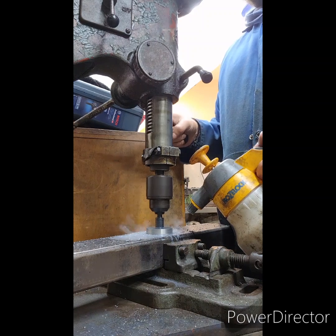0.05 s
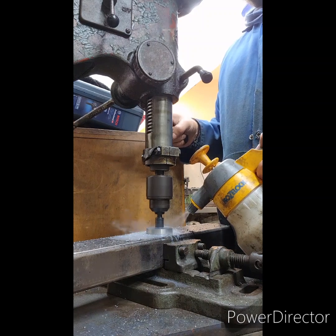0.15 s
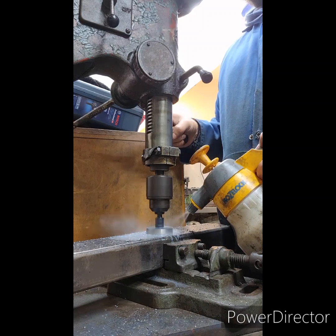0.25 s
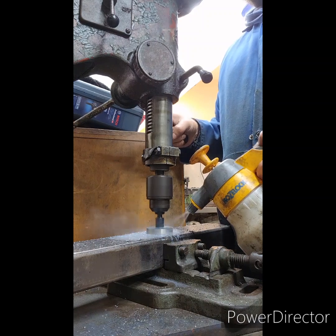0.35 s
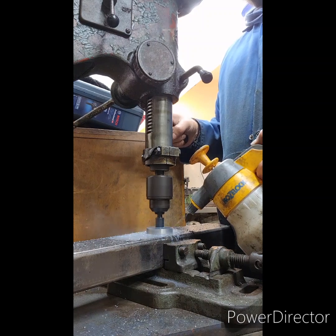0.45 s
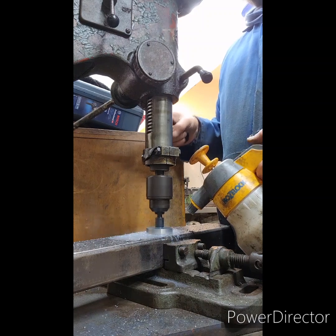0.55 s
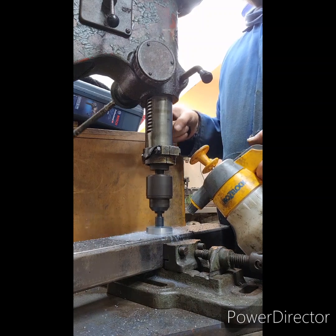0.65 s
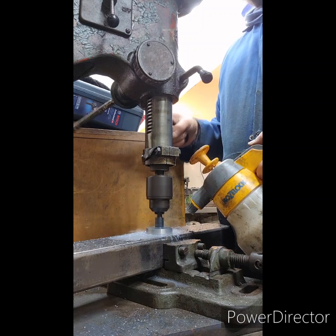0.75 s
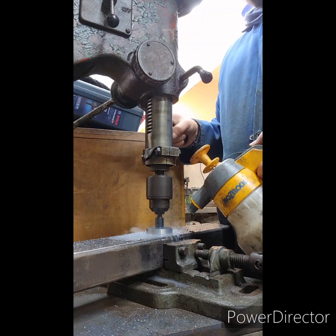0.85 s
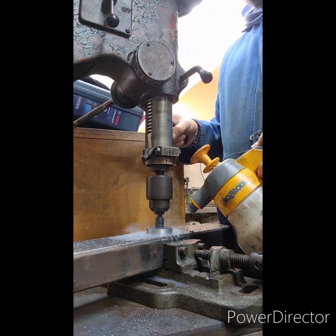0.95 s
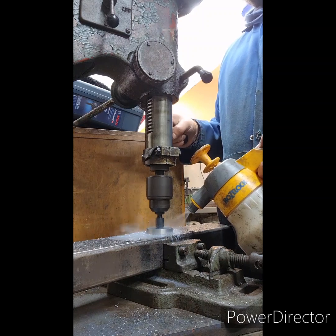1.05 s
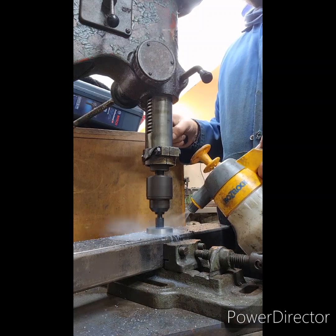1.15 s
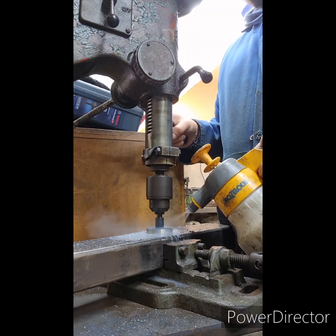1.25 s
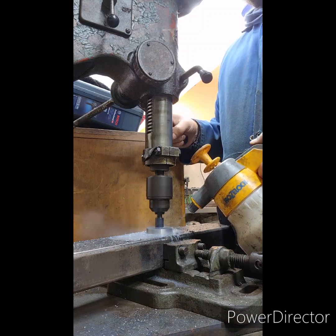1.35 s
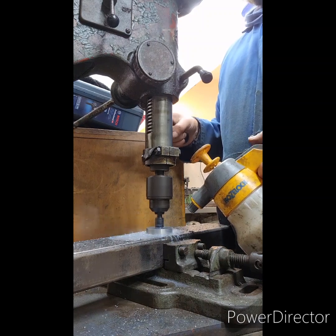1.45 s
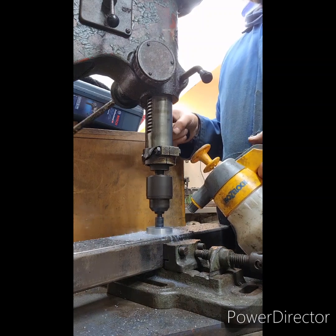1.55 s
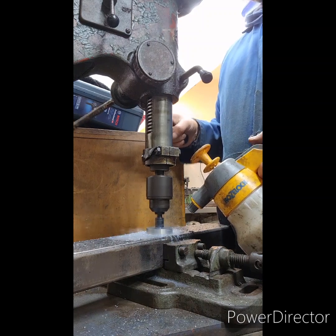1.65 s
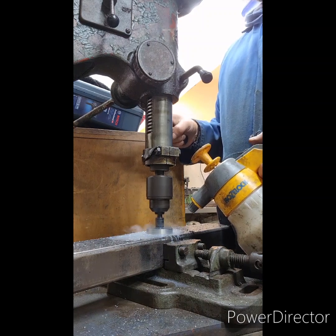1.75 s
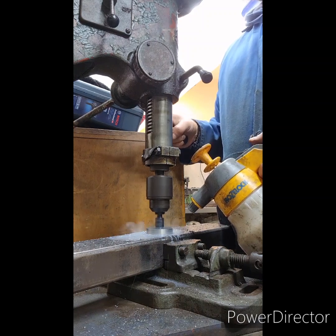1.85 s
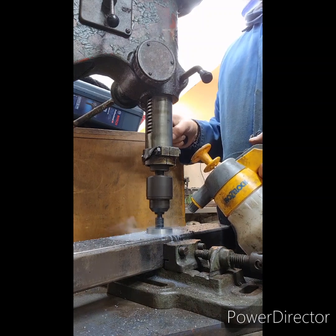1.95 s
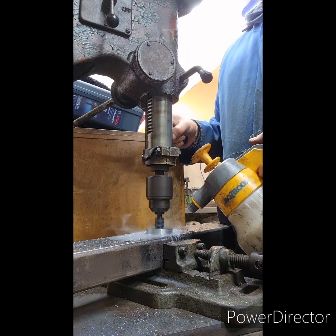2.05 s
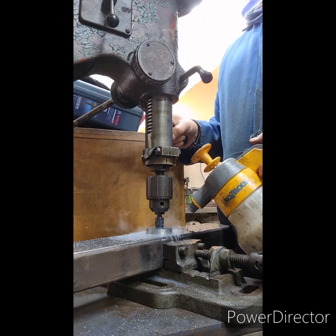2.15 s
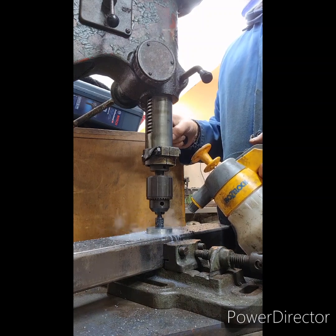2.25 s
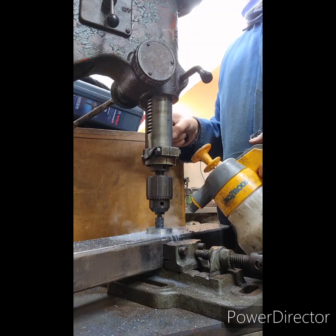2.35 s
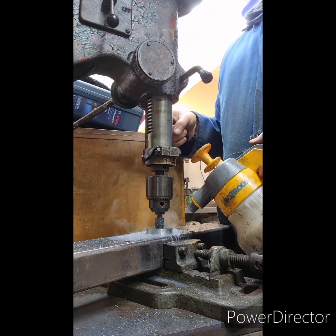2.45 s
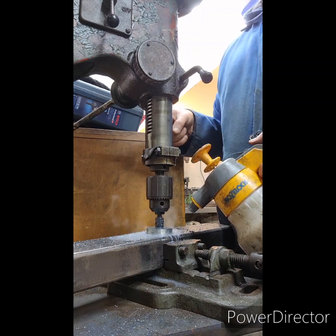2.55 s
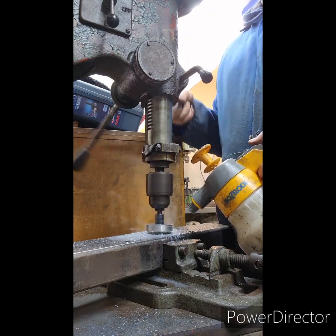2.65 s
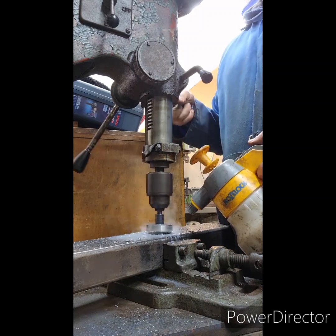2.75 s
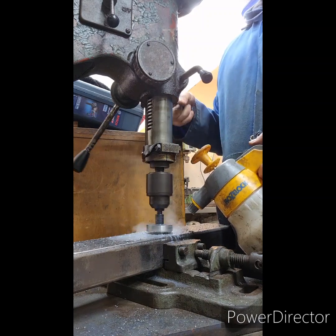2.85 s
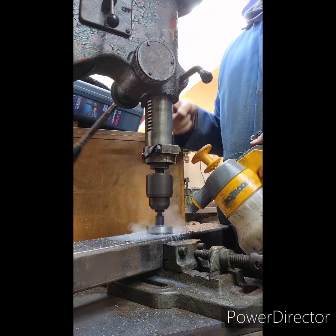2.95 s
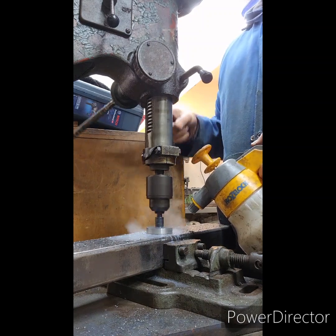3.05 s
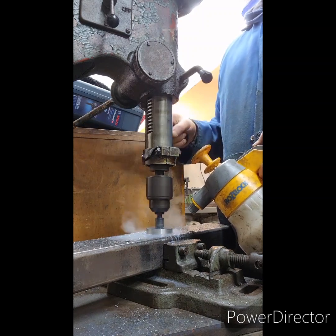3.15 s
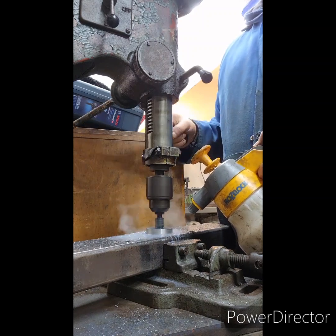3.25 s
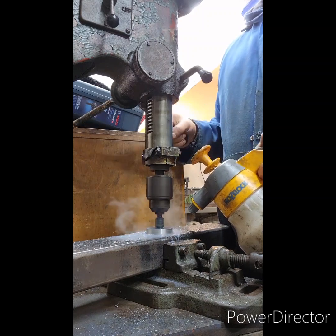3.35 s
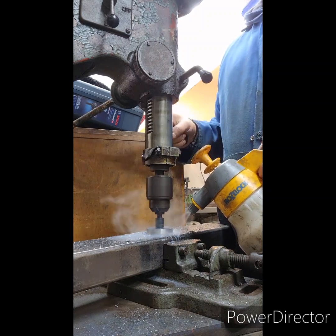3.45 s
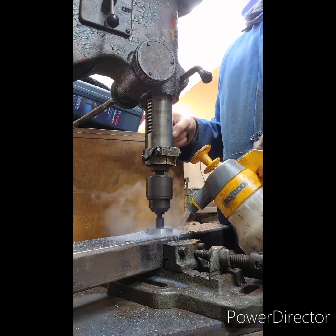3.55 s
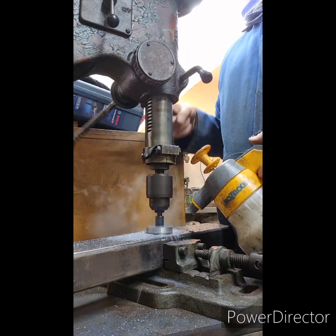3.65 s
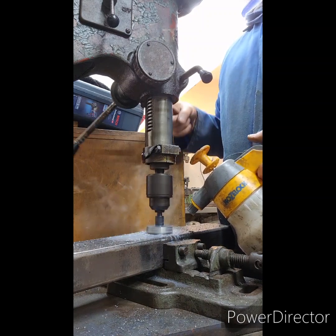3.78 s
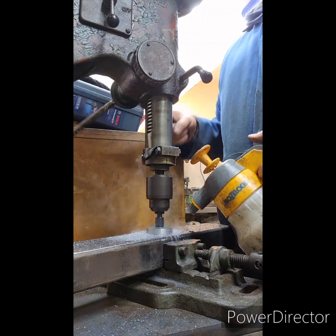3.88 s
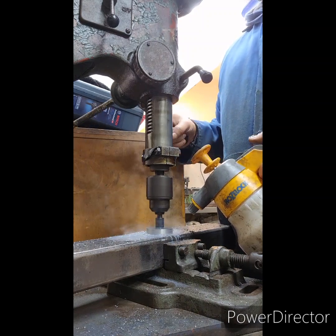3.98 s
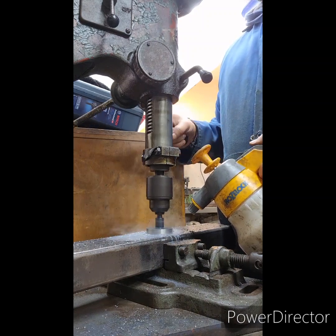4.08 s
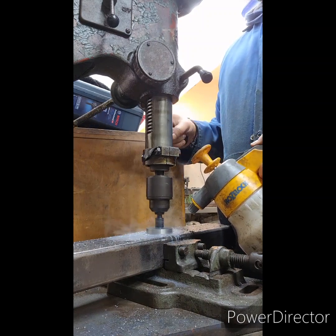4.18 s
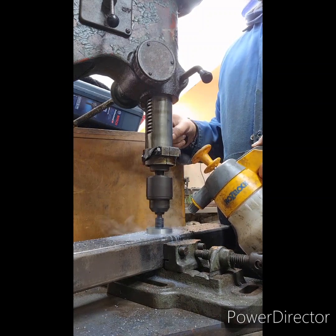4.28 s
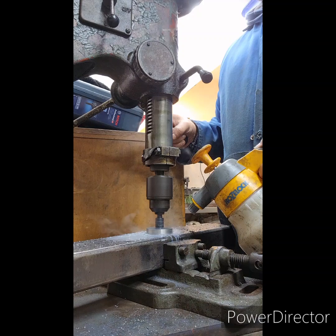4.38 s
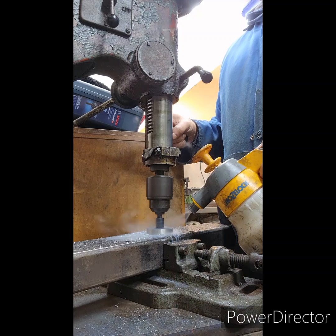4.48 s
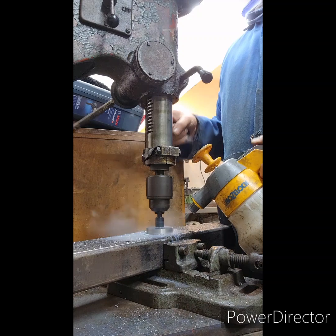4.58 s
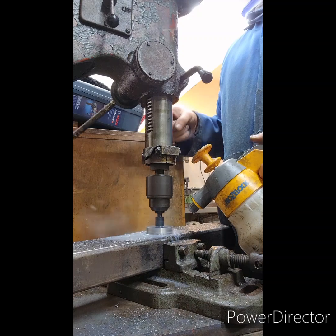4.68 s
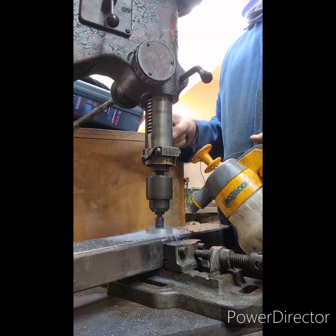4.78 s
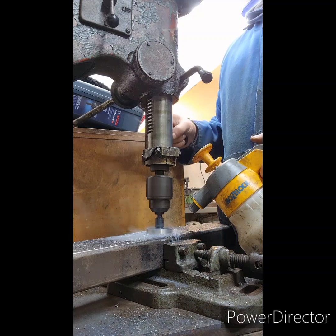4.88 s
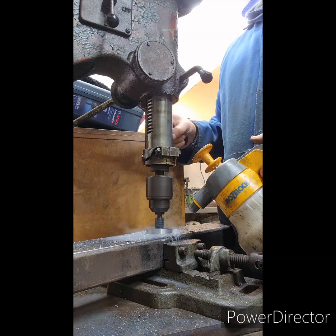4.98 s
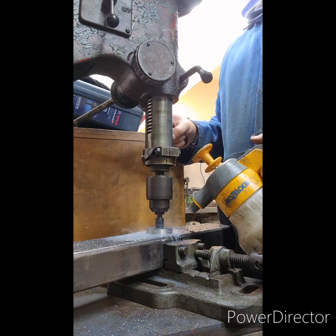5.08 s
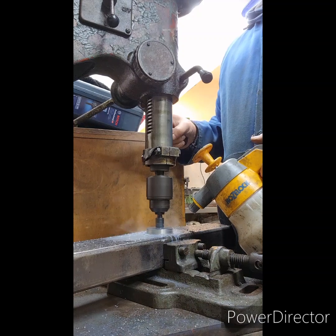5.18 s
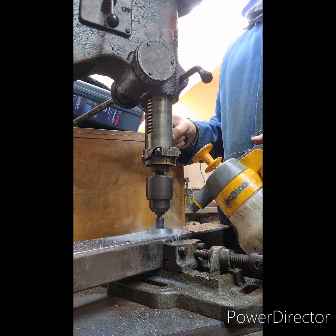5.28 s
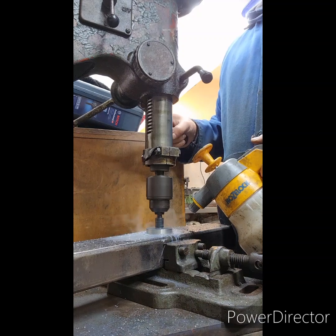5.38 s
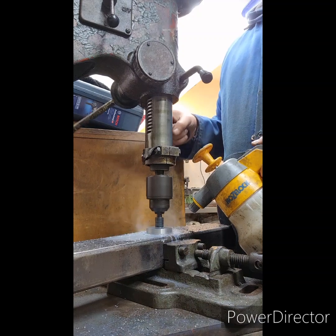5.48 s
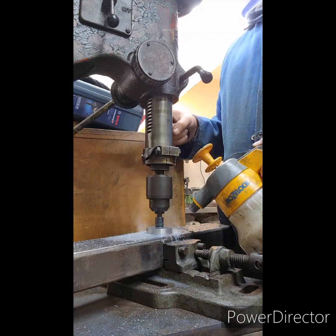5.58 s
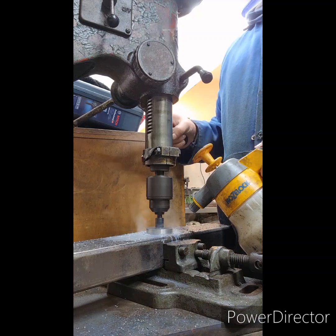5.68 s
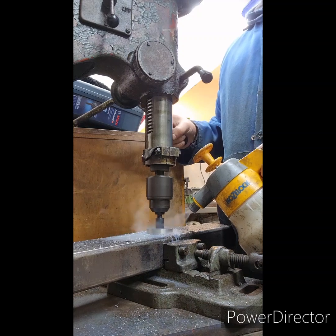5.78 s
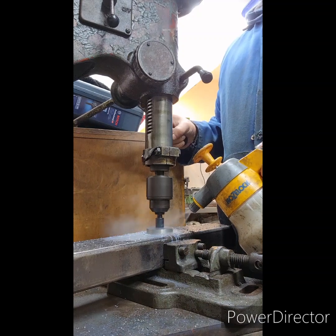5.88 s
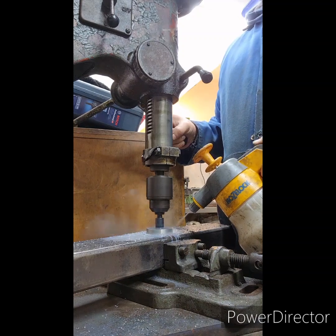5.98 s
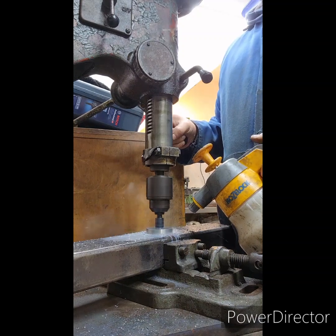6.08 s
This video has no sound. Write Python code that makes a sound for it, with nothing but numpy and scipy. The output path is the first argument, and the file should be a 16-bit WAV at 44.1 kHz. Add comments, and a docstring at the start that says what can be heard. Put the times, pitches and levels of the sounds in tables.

```python
"""Scraping, ringing steel: a hole saw in a pillar drill is fed into a box section in seven short pecks.
Filtered noise and noise-fed modes make the cut; tones make the chatter, its surges timed to spindle turns.
One light peck squeals at length. Between pecks a motor of summed shaft orders hums, and the slack drive
knocks about once a motor turn: noise blows, with a ringing quill. A small garage adds a short echo."""
import sys
import numpy as np
from scipy import signal
from scipy.fft import rfft, irfft
from scipy.io import wavfile

SR = 44100
rng = np.random.default_rng(int(sys.argv[2]) if len(sys.argv) > 2 else 0)


def generate_wav(sig):
    """Save sig (samples, or channels by samples) to the path in sys.argv[1] as 16-bit PCM at SR."""
    pcm = np.round(np.clip(np.atleast_2d(sig).T, -1, 1) * 32767).astype(np.int16)
    wavfile.write(sys.argv[1], SR, pcm)


N = 270333
T = np.arange(N) / SR


def amp(db):
    """Decibels to gain."""
    return 10 ** (np.asarray(db) / 20)


def unit(x):
    """Scales to rms 1."""
    return x / np.sqrt(np.mean(np.abs(x) ** 2) + 1e-20)


def read(points, hz):
    """Reads a spectrum table on a log-frequency axis."""
    f, value = np.transpose(points)
    return np.interp(np.log(hz + 1), np.log(f + 1), value)


def curve(rows, axis=1):
    """One column of a time table at every sample."""
    rows = np.asarray(rows)
    return np.interp(T, rows[:, 0], rows[:, axis])


def gate(rows, fade_s=0.023):
    """Open between the first and last row of a table, with a fade outside each end."""
    return np.clip(np.minimum(T - rows[0][0], rows[-1][0] - T) / fade_s + 1, 0, 1)


def stretch(start_s, length_s, fade_s):
    """Rises from 0 to 1 and falls back within a stretch of time."""
    return np.clip(np.minimum(T - start_s, start_s + length_s - T) / fade_s, 0, 1)


def hump(start_s, length_s):
    """Half-sine swell from 0 to 1 and back."""
    return np.sin(np.pi * np.clip((T - start_s) / length_s, 0, 1))


def phase_of(hz):
    """Phase in radians of a pitch curve."""
    return 2 * np.pi * np.cumsum(hz) / SR


def add(mix, start_s, sound):
    """Adds a sound into the mix at a start time."""
    part = mix[..., max(round(start_s * SR), 0):][..., :sound.shape[-1]]
    part += sound[..., :part.shape[-1]]


def drift(rate_hz):
    """Smooth random curve of rms 1, rolled off above the rate."""
    coarse = rng.standard_normal(4096)
    f = np.fft.rfftfreq(len(coarse), T[-1] / len(coarse))
    slow = irfft(rfft(coarse) / np.sqrt(1 + (f / rate_hz) ** 6))
    return unit(np.interp(T, np.linspace(0, T[-1], len(coarse)), slow))


def hiss():
    """Two unrelated white noises: a direct part and a scattered part."""
    return rng.standard_normal((2, N))


def colour(x, points, size=4096):
    """Causal minimum-phase filter with the given spectrum; keeps the power of white noise."""
    log_gain = np.log(amp(read(points, np.abs(np.fft.fftfreq(size, 1 / SR)))))
    taps = np.fft.ifft(np.exp(np.conj(signal.hilbert(log_gain)))).real[:size // 2]
    return signal.oaconvolve(x, taps[None] / np.linalg.norm(taps), axes=1)[:, :N]


def resonate(x, hz, width_hz):
    """A resonance of gain 1 that follows a pitch curve, with steep skirts."""
    turn = np.exp(2j * np.pi * np.cumsum(hz * np.ones(x.shape[-1])) / SR)
    r = np.exp(-np.pi * width_hz / np.sqrt(np.sqrt(2) - 1) / SR)  # two poles share the width
    baseband = x * turn.conj() + 1e-18
    smooth = signal.lfilter([(1 - r) ** 2], [1, -2 * r, r * r], baseband)
    return 2 * (turn * smooth).real


def streaks(x, depth_db, span_hz, span_s, size=1024):
    """Lets narrow patches of the spectrum swell and fade, as many weak modes do."""
    z = signal.stft(x, SR, nperseg=size, noverlap=size * 3 // 4)[2]
    across = np.fft.fftfreq(z.shape[1], SR / size)[:, None] * span_hz
    along = np.fft.fftfreq(z.shape[2], size / 4 / SR) * span_s
    blur = np.exp(-2 * (across ** 2 + along ** 2))
    field = np.fft.ifft2(np.fft.fft2(rng.standard_normal(z.shape[1:])) * blur).real
    z = z * amp(depth_db * unit(field))
    return unit(signal.istft(z, SR, nperseg=size, noverlap=size * 3 // 4)[1][:, :N])


def peck(start_s, attack_s, length_s, release_db_per_s):
    """Envelope of one peck: the teeth come in, hold, and are lifted out."""
    lifted = np.maximum(T - start_s - length_s, 0)
    return np.clip((T - start_s) / attack_s, 0, 1) ** 2 * amp(-release_db_per_s * lifted)


# pecks of the feed lever: start_s, attack_s, length_s (start to release), release_db_per_s, scrape_db,
#   screech_length_s, screech_db, first_surge_delay_s, chatter_hz, chatter_glide_hz_per_s, chatter_db
PECKS = [(-0.03, 0.077, 0.65, 168, -18.5, 0.21, -26, 0.072, 208, -6, -16),
         (0.849, 0.066, .69, 216, -18.5, 0.13, -28.5, 0.027, 215, -20.5, -18),
         (1.752, 0.043, .426, 280, -18, 0.22, -27, 0.1, 227, 110.5, -17.5),
         (3.192, 0.056, 0.47, 232, -25, .09, -23, 0.081, 215, -20, -29),
         (4.035, 0.037, 0.58, 213, -17.5, 0.1677, -25.5, 0.0434, 210, 1, -18.5),
         (4.9, .025, .585, 154, -18, 0.32, -33, 0.11, 220, 150, -18),
         (5.724, .13, 0.47, 200, -17.5, 0.069, -26, 0.13, 216, -22, -17.5)]
EASE_DB_PER_S = 4.5


def feed():
    """How hard the teeth scrape: each peck's pressure eases, then dies away as the lever is let up."""
    return sum(peck(start, attack, length, release) * amp(db - EASE_DB_PER_S * np.maximum(T - start, 0))
               for start, attack, length, release, db, *_ in PECKS)


# ringing of cup and steel while cutting: mode_hz, width_hz, relative_db
STEEL_MODES = [(1139, 17, -23), (1671, 66, -14), (1900, 30, -11.5), (2070, 160, -28), (2759, 40, -16.5),
               (3426, 97, -13.5), (3680, 13, -17.5), (4770, 430, -19), (5330, 49, -15), (6280, 110, -18),
               (6400, 21, -18), (6407, 45, -12.5), (10100, 85, -25.5), (11700, 120, -27)]
# broad colour of the scraping: frequency_hz, relative_db_per_hz
SCRAPE = [(300, -3.5), (550, 2), (900, -2), (1300, -1.5), (2100, 5), (3050, 0), (4600, 1), (5800, -0.5),
          (6900, 1), (7800, -9), (10300, -11), (12600, -15), (14500, -18), (15500, -26)]
# groan of the frame: frequency_hz, relative_db_per_hz
GROAN = [(25, -40), (55, -6), (85, -26), (130, -22), (190, 3.5), (270, 1.5), (350, 2.5), (430, -7.5),
         (510, -3.5), (670, -6), (850, -16.5), (1500, -56.5)]


def cutting(groan_db=-6, crumble_db=0.5, surge_db=0.3, swell_db=4, wander=0.0029):
    """Teeth tear chips off the steel: a gritty scrape, modes that swell in turn, and a groan in the frame."""
    bite = feed()
    force = bite * amp(surge_db * drift(2.2))
    grit = streaks(hiss() * amp(crumble_db * drift(450)), depth_db=2.6, span_hz=120, span_s=0.045)
    scrape = colour(grit * force, SCRAPE)
    rumble = streaks(hiss(), depth_db=1.5, span_hz=50, span_s=0.082)
    groan = amp(groan_db) * colour(rumble * force, GROAN)
    ring = 0
    for hz, width_hz, db in STEEL_MODES:
        # fed in bursts as the teeth catch and let go
        bursts = hiss() * amp(swell_db * drift(22))
        mode = resonate(bursts, hz * (1 + wander * drift(18)), width_hz)
        ring = ring + amp(db) * unit(mode)
    return scrape + groan + ring * bite


SPINDLE_HZ = 7.8
BUILD_S, SURGE_DB, CLIMB_HZ = 0.1, 4, 42  # CLIMB_HZ: pitch rise per spindle turn
CHATTER_STOP_S, CHATTER_RELEASE_DB_PER_S = 0.0089, 257  # needs full load: stops before the lever is let up


def chatter(jitter=0.028, flutter_db=1.5, second_db=-21, third_db=-21, lean_db=-0.1):
    """Under load the saw bounces on the springy quill: a lumpy low tone that surges every spindle turn."""
    pitch, level = np.full(N, 215.), np.zeros(N)
    for start, attack, length, _, _, _, _, delay, hz, glide, db in PECKS:
        since = np.maximum(T - start, 0)
        turn = ((since - delay) * SPINDLE_HZ + 0.5) % 1 - 0.5  # zero at the top of a surge
        trend = glide * (np.minimum(since, length) - length / 2)
        pitch = np.where(T >= start, hz + trend + CLIMB_HZ * turn, pitch)
        loaded = peck(start, attack, length - CHATTER_STOP_S, CHATTER_RELEASE_DB_PER_S)
        built = loaded * (1 - np.exp(-since / BUILD_S))
        level += built * amp(db + SURGE_DB * (np.cos(2 * np.pi * turn) - 0.5))
    phase = phase_of(pitch * (1 + jitter * drift(61)))
    second = amp(second_db + 2 * drift(6.1)) * np.sin(2 * phase)
    third = amp(third_db + 2 * drift(6.1)) * np.sin(3 * phase)
    tone = unit((np.sin(phase) + second + third) * amp(flutter_db * drift(26)))
    return amp(lean_db * np.array([[1], [-1]])) * level * tone


# squeal through the light peck: time_s, pitch_hz, relative_db
SQUEAL = [(3.245, 1750, -31), (3.271, 1713, -17.5), (3.325, 1693, -28), (3.363, 1656, -19),
          (3.393, 1694, -31), (3.473, 1636, -27), (3.501, 1634, -35), (3.617, 1614, -27),
          (3.643, 1653, -16), (3.693, 1670, -28), (3.77, 1666, -47)]
# brief squeals early in two heavy pecks: start_s, length_s, pitch_hz, relative_db
BRIEF_SQUEALS = [(0.023, 0.081, 1723, -24), (4.062, .07, 1680, -21)]


def squeal(level_db=-0.5, jitter=0.0054, flutter_db=3, octave_flutter_db=3,
           fuzz_width_hz=170, octave_db=-21, octave_width_hz=220):
    """Lightly loaded teeth stick and slip on a mode of the saw cup: a rough whistle with its octave."""
    pitch, level = curve(SQUEAL), gate(SQUEAL) * amp(curve(SQUEAL, axis=2))
    for start, length, hz, db in BRIEF_SQUEALS:
        pitch = np.where((T > start) & (T < start + length), hz, pitch)
        level = level + amp(db) * hump(start, length)
    phase = phase_of(pitch * (1 + jitter * drift(83)))
    tone = unit(np.array([np.sin(phase), np.cos(phase)]) * amp(flutter_db * drift(59)))
    rasp = 0.25 * unit(resonate(hiss(), pitch, fuzz_width_hz))
    fluttering = hiss() * amp(octave_flutter_db * drift(25))
    octave = amp(octave_db) * unit(resonate(fluttering, 2 * pitch, octave_width_hz))
    # the octave saturates early, so the quiet stretches sound the roughest
    octave_level = 0.2 * np.tanh(level / 0.045)
    return amp(level_db) * (level * unit(tone + rasp) + octave_level * octave)


ENTRY_HZ, SETTLED_HZ, SETTLE_SHARE = 2980, 1856, 0.25  # SETTLE_SHARE: time constant / screech length


def entries(width_hz=260):
    """At the start of each peck the first teeth screech, falling onto a steel mode as they dig in."""
    out = np.zeros((2, N))
    for start, attack, _, _, _, length, db, *_ in PECKS:
        u = np.linspace(0, 1, round(length * SR))
        hz = SETTLED_HZ + (ENTRY_HZ - SETTLED_HZ) * np.exp(-u / SETTLE_SHARE)
        tone = resonate(rng.standard_normal((2, len(u))), hz, width_hz)
        add(out, start + attack * 0.65, amp(db) * unit(tone * signal.windows.tukey(len(u), 0.4)))
    return out


# loudest snags of single teeth: start_s, length_s, pitch_hz (mid-screech), level_db
SCREECHES = [(0.574, 0.11, 2000, -29.5), (3.342, 0.074, 2000, -30), (3.37, 0.053, 2834, -32),
             (3.645, 0.054, 1983, -25.5), (5.3, 0.041, 6440, -24.5), (5.401, 0.049, 2203, -32)]


def screeches(width_hz=190, sag=0.014):
    """A tooth snags and sets one mode screeching; the pitch sags as the tooth digs in."""
    out = np.zeros((2, N))
    for start, length, hz, db in SCREECHES:
        u = np.linspace(0, 1, round(length * SR))
        tone = resonate(rng.standard_normal((2, len(u))), hz * (1 + sag * (0.5 - u)), width_hz)
        add(out, start, amp(db) * unit(tone * signal.windows.tukey(len(u), 0.6)))
    return out


LOADED_DB = -2.5  # cutting load takes up some play
SMOOTH_FROM_S, SMOOTH_LENGTH_S, SMOOTH_FADE_S, SMOOTH_DB = 2.15, 0.604, 0.099, -11  # quill held clear


def slack_db():
    """Looseness of the drive: greatest between pecks, least while the quill is held clear."""
    loaded = sum(peck(*row[:4]) for row in PECKS)
    return LOADED_DB * loaded + SMOOTH_DB * stretch(SMOOTH_FROM_S, SMOOTH_LENGTH_S, SMOOTH_FADE_S)


# single knocks of the drive, some thudding hard, some mostly a ring of the quill:
#   start_s, force_relative_db, ring_relative_db
KNOCKS = [(0.793, -39, -32.5), (0.838, -42, -56), (1.652, -23, -30), (1.734, -40, -32), (2.726, -19, -32),
          (2.845, -19, -27.5), (2.967, -20, -34), (3.006, -19, -32), (3.09, -18, -40), (3.127, -21.5, -45),
          (3.776, -21.5, -48), (3.817, -18, -31), (3.898, -20, -29.5), (4.753, -38, -26.5),
          (4.872, -21.5, -34), (5.614, -34, -33.5), (5.692, -28, -29.5), (5.736, -20.5, -35)]
# dull body of a knock: frequency_hz, relative_db_per_hz
THUD = [(40, -14), (90, -0.5), (140, -11.5), (220, 2.5), (300, 3.5), (450, -1.5), (680, -5.5), (900, -13.5),
        (1500, -23.5), (3000, -76.5)]
# bright tick of a knock: frequency_hz, relative_db_per_hz
TICK = [(600, -4), (1100, -1), (1600, 0), (1950, -3), (2600, 1), (2900, 1), (3150, -3), (3450, 1),
        (3850, -4), (4280, 0), (4700, -3), (6500, -1), (7900, -11), (11800, -12), (15000, -20)]
# ring of the quill: mode_hz, relative_db, t60_s
QUILL_MODES = [(2305, 0, 0.049), (2410, -11, 0.062), (4250, -18, 0.12)]
BRIGHTEN, MIDDLING_DB = 0.39, -22  # extra tick dB per dB of force above middling


def knocks(thud_db=3, tick_db=-11, tail_db=-26, tail_s=0.067, dry_hz=400, rub_s=0.0072):
    """Single blows in the spindle drive: a thud, a tick, and a brief rub that rings the quill."""
    t = np.arange(SR // 5) / SR
    thuds, ticks, rings = np.zeros((3, 2, N))
    strike = (1 - np.exp(-t / 0.0004)) * np.exp(-t / 0.008)
    blow = strike + amp(tail_db) * np.exp(-t / tail_s)
    free = np.maximum(t - rub_s, 0)  # the modes die away once the rub ends
    for start, force, ring in KNOCKS:
        tick = force + BRIGHTEN * (force - MIDDLING_DB)
        add(thuds, start, amp(force + thud_db) * blow * rng.standard_normal((2, len(t))))
        add(ticks, start, amp(tick + tick_db) * blow * rng.standard_normal((2, len(t))))
        phases = rng.random() + np.array([[0], [1 / 4]])  # in turns
        modes = sum(amp(db - 60 * free / t60) * np.sin(2 * np.pi * (hz * t + phases))
                    for hz, db, t60 in QUILL_MODES)
        add(rings, start, amp(ring) * modes * (1 - np.exp(-t / 0.00024)))
    # too brief to move the heavy frame
    thuds = signal.lfilter(*signal.butter(1, dry_hz, "high", fs=SR), thuds)
    return colour(thuds, THUD) + colour(ticks, TICK) + rings


MOTOR_HZ = 24.95
# around the light peck the saw skims the steel, which hardens the rattle
SKIM_FROM_S, SKIM_LENGTH_S, SKIM_FADE_S, SKIM_TICK_DB, SKIM_THUD_DB = 2.66, 1.6, 0.048, 6, 2


def rattle(thud_db=-29, tick_db=-49, ring_db=-49, rub_db=-50, uneven_db=2.0):
    """Drive play is taken up about once a motor turn, in step with the single knocks, over a rub."""
    times = np.array([0] + [row[0] for row in KNOCKS] + [T[-1]])
    whole_turns = np.round(np.diff(times, prepend=0) * MOTOR_HZ)
    turns = np.interp(T, times, np.cumsum(whole_turns))
    since = turns % 1 / MOTOR_HZ
    blow = (1 - np.exp(-since / 0.001)) * np.exp(-since / 0.024)
    slack = slack_db()
    blows = unit(blow * amp(uneven_db * drift(5.1))) * amp(slack)
    ring = sum(amp(db) * unit(resonate(hiss() * blows, hz, 2.2 / t60)) for hz, db, t60 in QUILL_MODES)
    skim = stretch(SKIM_FROM_S, SKIM_LENGTH_S, SKIM_FADE_S)
    tick_and_rub = amp(tick_db) * blows + amp(rub_db) * amp(slack / 2)
    bright = colour(hiss() * amp(SKIM_TICK_DB * skim) * tick_and_rub, TICK)
    thud = amp(thud_db) * colour(hiss() * blows * amp(SKIM_THUD_DB * skim), THUD)
    return thud + bright + amp(ring_db) * ring


# thin squeaks while the feed is eased: start_s, length_s, pitch_hz, level_db
SQUEAKS = [(0.788, .05, 8080, -42), (1.647, 0.039, 8100, -47), (1.74, 0.038, 8050, -44),
           (3.184, 0.044, 8050, -46), (4.826, 0.042, 8300, -41), (5.763, 0.022, 8100, -41)]


def squeaks():
    """Brief thin whistles of rubbing metal: sines with a jittered pitch."""
    out = np.zeros((2, N))
    for start, length, hz, db in SQUEAKS:
        out += amp(db) * hump(start, length) * np.sin(phase_of(hz * (1 + 0.0058 * drift(150))))
    return out


# free-running motor: order (multiple of shaft rate), relative_db
MOTOR_ORDERS = [(1, -24), (2, -19), (3, -21), (4, -17), (5, -4), (6, -4), (7, -10), (8, -2), (9, 0),
                (10, -10), (11, -7), (12, -13), (14, -14), (15, -14), (17, -18), (18, -20), (20, -13),
                (21, -19), (22, -18), (23, -15), (24, -6), (25, -20), (26, -16), (28, -24), (37, -26),
                (38, -24), (39, -25)]
# belt and bearing noise: frequency_hz, relative_db_per_hz
BEARINGS = [(25, -14), (55, -1), (85, -11), (140, -3), (220, -5), (400, -20), (600, -19), (900, -22),
            (1900, -26), (2350, -18), (3100, -25), (5000, -20), (6500, -19), (8000, -28), (15500, -35)]


def motor(level_db=-31.5, hum_db=-37, bearings_db=-40, shake_db=5, wobble_turns=0.021, waver_db=2.9,
          shaking_orders=(5, 6)):
    """Shaft orders of motor and belt, two of which swell with slack, a low hum, and bearing noise."""
    slack = amp(slack_db())
    turns = np.cumsum(MOTOR_HZ * (1 + 0.001 * drift(2.18))) / SR
    # a rattling drive runs unevenly, which smears the high orders
    turns = turns + wobble_turns * slack * drift(31)
    orders = 0
    for k, db in MOTOR_ORDERS:
        gain = amp(db + waver_db * drift(8.2) + shake_db * slack * (k in shaking_orders))
        orders = orders + gain * np.sin(2 * np.pi * (round(k) * turns + rng.random()))
    calm_rms = np.sqrt(sum(amp(db) ** 2 for _, db in MOTOR_ORDERS) / 2)
    hum = amp(hum_db) * unit(np.sin(phase_of(99.5 * (1 + 0.013 * drift(6)))))
    drone = amp(level_db) * orders / calm_rms + hum * slack
    return drone, amp(bearings_db) * colour(hiss(), BEARINGS)


# likeness of the two microphone ports: frequency_hz, shared_power_0_to_1
LIKENESS = [(60, .99), (100, 0.97), (160, 0.14), (270, 0.93), (450, 0.93), (740, 0.32), (1200, 0.12),
            (1800, 0.78), (3000, 0.2), (15000, 0.13)]
# level balance: frequency_hz, left_minus_right_db
LEAN = [(60, -1), (100, -2), (200, -3.5), (450, -2), (740, -4), (1220, -2.5), (2100, 0), (3330, -2),
        (5500, -3.5), (9080, -7), (15000, -9)]
# phase offset: frequency_hz, left_lead_rad
LEAD = [(200, 0.55), (700, .5), (1100, 3.37), (1800, 1.79), (3000, 1.44), (15000, 1.6)]


def ports(pair, size=2048):
    """Spreads a direct and a scattered part over the two microphone ports, keeping the mid level."""
    hz, _, (direct, scattered) = signal.stft(pair, SR, nperseg=size)
    hz = hz[:, None]
    same = np.sqrt(np.clip(read(LIKENESS, hz), 0, 0.999))
    lean, lead = amp(read(LEAN, hz) / 2), read(LEAD, hz)
    left = lean * direct * np.exp(0.5j * lead)
    mixed = same * direct + np.sqrt(1 - same ** 2) * scattered
    right = mixed / lean * np.exp(-0.5j * lead)
    mid = np.sqrt(lean ** 2 + lean ** -2 + 2 * same * np.cos(lead)) / 2
    return signal.istft(np.array([left, right]) / mid, SR, nperseg=size)[1][:, :N]


def garage(x, wet_db=-17, t60_s=0.055):
    """A short cluttered echo of decaying noise taps, different at each port."""
    t = np.arange(SR // 3) / SR
    taps = rng.standard_normal((2, len(t))) * amp(-60 * t / t60_s) * (t > 0.004)
    taps = signal.sosfilt(signal.butter(2, 500, "high", fs=SR, output="sos"), taps)
    return x + amp(wet_db) * signal.fftconvolve(x, taps / np.linalg.norm(taps[0]), axes=1)[:, :N]


def scene():
    """The cut and the machine, heard from close by; the motor drone stays dry and centred."""
    drone, bearings = motor()
    cut = cutting() + squeal() + entries() + screeches()
    drive = knocks() + rattle() + squeaks() + bearings
    return garage(ports(cut + drive) + chatter()) + drone


EDGE_HZ = 15650


def record(dry):
    """Soft limiting of the highest peaks, then a low-pass band limit."""
    limited = dry / (1 + dry ** 8) ** (1 / 8)
    lowpass = signal.firwin(511, EDGE_HZ, window=("kaiser", 9), fs=SR)
    return signal.oaconvolve(limited, lowpass[None], "same")


dry = scene()
out = record(dry)
generate_wav(out)
```